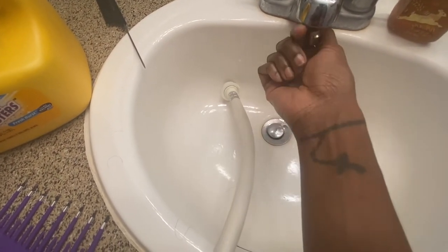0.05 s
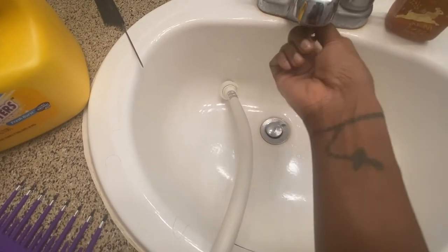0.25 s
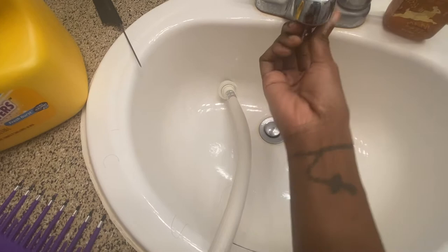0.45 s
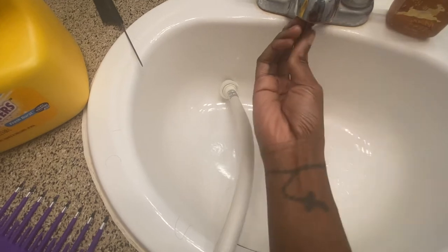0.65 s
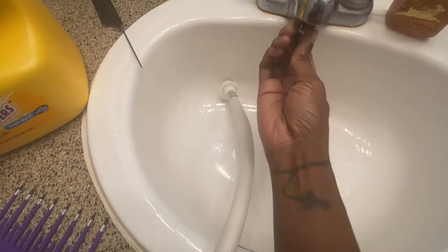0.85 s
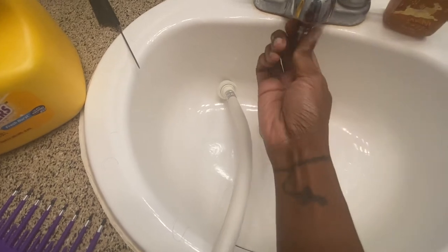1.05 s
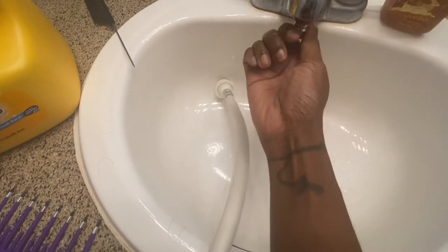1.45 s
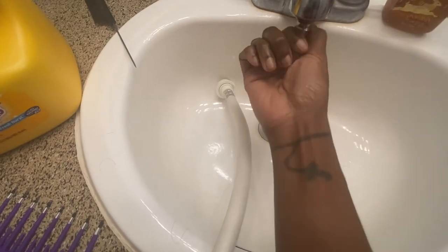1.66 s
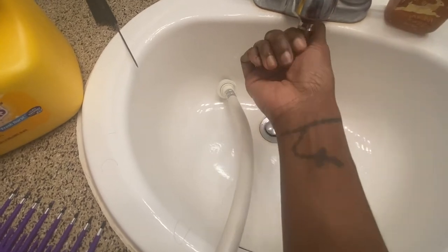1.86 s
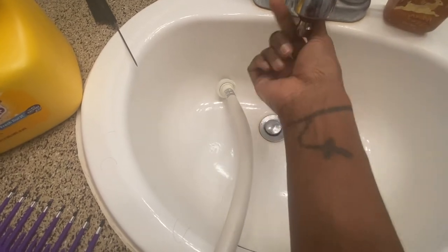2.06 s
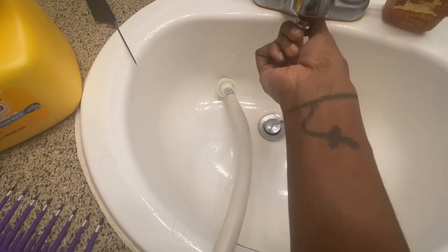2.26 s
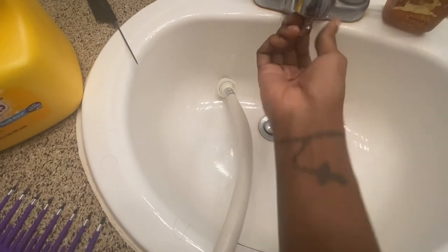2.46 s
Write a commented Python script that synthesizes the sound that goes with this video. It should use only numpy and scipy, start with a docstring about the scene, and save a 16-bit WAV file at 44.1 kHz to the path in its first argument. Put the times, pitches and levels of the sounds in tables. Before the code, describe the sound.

Metal tap fitting clicking and scraping irregularly as fingers twist it in a small bathroom.

```python
"""Twisting a tap fitting.

Fingers twist a metal fitting on a bathroom tap, close by. The loose thread clicks and scrapes,
driving the modes of tap and basin, and the spout rings briefly. Firm pushes thump the sink top.
A small hard room reflects the metal sounds, over a low steady hum."""
import sys
import numpy as np
from scipy import signal
from scipy.fft import rfft, irfft
from scipy.io import wavfile

SR = 44100
rng = np.random.default_rng(int(sys.argv[2]) if len(sys.argv) > 2 else 0)


def to_wav(s):
    """Save 16-bit WAV."""
    ch = np.atleast_2d(s).T  # columns
    pcm = np.round(np.clip(ch, -1, 1) * 32767)  # PCM
    wavfile.write(sys.argv[1], SR, pcm.astype(np.int16))


N = 110250
SHOT = 16384  # samples per event buffer


def undb(db):
    """Decibels to gain."""
    return 10 ** (np.asarray(db) / 20)


def curve(hz, points, values):
    """Linear interpolation over log frequency."""
    return np.interp(np.log(hz + 1e-9), np.log(points), values)


def fade(t, t60):
    """Exponential decay, 60 dB down at t60."""
    return np.exp(-np.log(1000) * t / t60)


def wander(rate_hz):
    """Random values joined by straight lines."""
    steps = np.arange(0, SHOT, SR / rate_hz)
    return np.interp(np.arange(SHOT), steps, rng.standard_normal(len(steps)))


def pan(db):
    """Stereo gains for a left-minus-right level."""
    return undb(np.array([[db], [-db]]) / 2)


def add(out, start_s, sound):
    """Mix a sound in at its start time."""
    i = max(int(start_s * SR), 0)
    n = max(min(sound.shape[-1], N - i), 0)
    out[:, i:i + n] += sound[:, :n]


# room noise spectrum (frequency [Hz], relative density [dB])
RUMBLE_SPECTRUM = [(20, 7.5), (27, -12), (40, -18), (70, 3), (160, -9), (250, -32.5), (500, -40),
                   (1000, -41.5), (3000, -53.5), (11000, -60.5), (15000, -76)]

def rumble(level_db=-47.5, wide_hz=500):
    """Quiet room noise, nearly mono in the bass."""
    hz = np.arange(N // 2 + 1) * SR / N
    mid, side = rfft(rng.standard_normal((2, N))) * undb(curve(hz, *np.array(RUMBLE_SPECTRUM).T))
    width = np.clip(hz / wide_hz, .15, 1)
    air = irfft(mid + side * width * np.array([[1], [-1]]), N)
    return air / air.std() * undb(level_db)


def hum(hz=119.1, level_db=-50.5, waver_db=3):
    """Electrical hum, wavering in level."""
    t = np.arange(N) / SR
    waver = np.interp(t, np.linspace(0, t[-1], 30), rng.standard_normal(30))
    return np.sqrt(2) * undb(level_db + waver_db * waver) * np.sin(2 * np.pi * hz * t) * pan(-4)


# room tail (frequency [Hz], t60 [s], level re direct sound [dB])
ROOM_TAIL = [(150, 0.32, 2), (392, 0.31, 2), (1057, 0.28, -5), (2360, 0.22, -9.5), (5000, 0.22, -4),
             (10900, 0.17, -9)]

def room(dry, build_s=.0065):
    """Dense reflections off hard walls; the treble dies first."""
    t = np.arange(2 * SHOT) / SR
    hz = np.arange(SHOT + 1) * SR / (2 * SHOT)
    noise = rfft(rng.standard_normal((2, 2 * SHOT)))
    tail = 0
    for weights, (_, t60, db) in zip(np.eye(len(ROOM_TAIL)), ROOM_TAIL):
        band = irfft(noise * curve(hz, np.array(ROOM_TAIL)[:, 0], weights))
        envelope = (1 - np.exp(-t / build_s)) * fade(t, t60)
        tail = tail + band * envelope * undb(db) / np.sqrt(np.sum(envelope ** 2))
    return signal.fftconvolve(dry, tail, axes=1)[:, :N]


# low room modes (frequency [Hz], level re thump [dB], t60 [s])
BOOM_MODES = [(75.5, -13.5, 1), (163.3, -25, 0.93), (189.9, -30.5, 0.69)]
# thud noise band (low edge [Hz], high edge [Hz])
THUD_BAND_HZ = [150, 260]
# pushes on the sink top (start [s], relative level [dB], pitch [Hz])
PUSHES = [(0.206, -16.5, 88), (.251, -22.5, 111), (.323, -25.5, 78), (.354, -29, 81), (0.533, -35, 95),
          (.673, -25.5, 91.5), (0.741, -31.5, 76.6), (0.879, -30.5, 105.6), (1.112, -27, 94),
          (1.212, -38, 69.6), (1.388, -37, 88), (1.566, -34, 95), (2.171, -27.5, 80), (2.319, -31, 90)]

def thumps(rise_s=.0301, gain_db=1.5, thud_db=-21):
    """The pushed sink top swings a few cycles, leaving a low boom and a dull thud."""
    out, t = np.zeros((2, N)), np.arange(2 * SHOT) / SR
    age = t / rise_s
    swell = (age * np.exp(1 - age)) ** 12.6
    build = 1 - np.exp(-age ** 2)
    boom = build * sum(undb(db) * fade(t, t60) * np.sin(2 * np.pi * hz * t) for hz, db, t60 in BOOM_MODES)
    thud_filter = signal.butter(2, THUD_BAND_HZ, "band", fs=SR, output="sos")
    for start, db, hz in PUSHES:
        noise = signal.sosfilt(thud_filter, rng.standard_normal((3, len(t))))
        stereo = (noise[0] + .5 * noise[1:]) / noise.std()
        thud = stereo * undb(thud_db) * build * fade(t, t60=.34)
        swing = -swell * np.cos(2 * np.pi * hz * (t - rise_s))
        add(out, start, undb(db + gain_db) * pan(-3) * (boom + thud + swing))
    return out


# tap and basin modes (frequency [Hz], relative peak [dB], t60 [s])
TAP_MODES = [(806, -7, 0.52), (907, 8.5, 0.09), (1030.6, 11, 0.032), (1113, 4, 0.15), (1313, 7, 0.22),
             (1415, 7, 0.21), (2269, 17, 0.029), (2336, 14.5, 0.043), (2700, 6.5, 0.11), (3050, 5, 0.07),
             (3504, 11, 0.038), (4014, 5, 0.098), (5430, 6.5, 0.064), (5786, 4.5, 0.054)]
# contact colour (frequency [Hz], relative level [dB])
CONTACT_SPECTRUM = [(90, 2), (180, 7.5), (300, 0.5), (440, -2.5), (600, -5), (780, -2.5), (1100, -2),
                    (1650, 3), (2300, -10), (2750, -11.5), (4400, -18.5), (5800, -21.5), (6800, -27.5),
                    (8400, -24.5), (9700, -10.5), (11300, -16), (12500, -39.5), (15000, -36)]

def tap_response(grip_detune=.014, grip_db=4):
    """Tap and basin under one contact: broad colour, narrow modes shifted and weighted by the grip."""
    hz = np.arange(SHOT // 2 + 1) * SR / SHOT
    grip = rng.uniform(-1.01, 1, (len(TAP_MODES), 2))
    modes = 1 + 0j
    for (mode_hz, db, t60), (shift, weight) in zip(TAP_MODES, grip):
        offset_hz = hz - mode_hz * (1 + grip_detune * shift)
        modes = modes + undb(db + grip_db * weight) / (1 + 2j * np.pi * offset_hz * t60 / np.log(1000))
    cepstrum = irfft(np.log(undb(curve(hz, *np.array(CONTACT_SPECTRUM).T))))
    cepstrum[1:SHOT // 2] *= 2  # fold to minimum phase
    cepstrum[SHOT // 2 + 1:] = 0
    return modes * np.exp(rfft(cepstrum))


# band edges (low/mid [Hz], mid/high [Hz], high/top [Hz])
CROSSOVERS_HZ = [1600, 3000, 7000]

def drive_tap(envelope, band_db, length_s, shared_power=.27):
    """A noisy force drives the tap; each band gets the energy of its level held for length_s."""
    hz = np.arange(SHOT // 2 + 1) * SR / SHOT
    common, *sides = rfft(rng.standard_normal((3, SHOT)) * envelope)
    force = np.sqrt(shared_power) * common + np.sqrt(1 - shared_power) * np.array(sides)
    spectrum = force * tap_response()
    lowpass = [0] + [1 / (1 + (hz / edge) ** 16) for edge in CROSSOVERS_HZ] + [1]
    out = 0
    for k, db in enumerate(band_db):
        band = irfft(spectrum * (lowpass[k + 1] - lowpass[k]))[:, :SHOT // 2]
        energy = np.sum(band ** 2, axis=1, keepdims=True)
        out = out + band * undb(db) * np.sqrt(length_s * SR / energy)
    return out


# thread scrapes, relative levels (start [s], length [s], low [dB], mid [dB], high [dB], top [dB])
THREAD_SCRAPES = [(0.209, 0.073, -39, -44, -51, -81), (0.266, 0.017, -36, -67, -60, -79),
                  (0.382, 0.064, -45, -55.5, -62.5, -69.5), (0.556, 0.046, -48.5, -60, -63.5, -67),
                  (.69, 0.064, -36.5, -45, -58, -68), (0.881, 0.0572, -35.5, -43.5, -53, -61.5),
                  (1.068, 0.029, -44.5, -67, -72, -92), (1.095, 0.0378, -34, -39.5, -38, -57.5),
                  (1.195, 0.049, -43.5, -51, -60.5, -72), (1.433, 0.151, -51.5, -55, -61.5, -66.5),
                  (1.567, 0.045, -51.5, -43.5, -53.5, -61), (1.623, 0.14, -49, -53.5, -60.5, -67),
                  (1.926, 0.025, -42.5, -56.5, -70, -71.5), (2.286, 0.063, -47, -67, -63, -72)]

def scrapes(gain_db=-5, slips_per_s=3700, spread_db=5, grain_s=.0022, edge_s=.0075, catch_db=2.5):
    """The thread sticks and slips in dense grains, louder where it catches."""
    out, t = np.zeros((2, N)), np.arange(SHOT) / SR
    for start, length, *band_db in THREAD_SCRAPES:
        slips = (rng.random(SHOT) < slips_per_s / SR) * undb(spread_db * rng.standard_normal(SHOT))
        grains = signal.lfilter([1], [1, -np.exp(-1 / (grain_s * SR))], slips) + 1e-6
        gate = np.clip(np.minimum(t, length - t) / edge_s, 0, 1)
        catches = undb(catch_db * wander(rate_hz=420))
        add(out, start, drive_tap(grains * gate * catches, band_db, length) * undb(gain_db))
    return out


def ring(hz, t60, rise_s=.001, right_lag_rad=1.32):
    """One decaying mode, out of step between left and right."""
    t = np.arange(SHOT) / SR
    phase = 2 * np.pi * hz * t - np.array([[0], [right_lag_rad]])
    return np.sin(phase) * (1 - np.exp(-t / rise_s)) * fade(t, t60)


# spout chimes (start [s], pitch [Hz], level [dB])
SPOUT_CHIMES = [(.263, 1848, -32), (.338, 1840, -32.5), (.552, 1600, -44), (0.681, 1376, -32.5),
                (.68, 750, -34), (.686, 867, -30), (.686, 1766, -40.5), (0.681, 472, -36),
                (1.125, 1322, -30), (1.122, 813, -36), (1.12, 3526, -41.5), (1.577, 2500, -40),
                (2.183, 850, -42), (2.332, 790, -42)]

def chimes(t60=.14, beat_hz=21, partner_db=-13, waver_db=3):
    """The spout rings on after firmer clicks; close mode pairs beat and the level flickers."""
    out = np.zeros((2, N))
    for start, hz, db in SPOUT_CHIMES:
        pair = ring(hz, t60) + undb(partner_db) * ring(hz + beat_hz, t60)
        add(out, start, undb(db + waver_db * wander(rate_hz=110)) * pair)
    return out


# fitting clicks, relative levels (time [s], swell [s], low [dB], mid [dB], high [dB], top [dB],
# ring pitch [Hz], ring level [dB], left minus right [dB])
FITTING_CLICKS = [(0.154, 0.009, -44.5, -51, -67, -67.5, 1092, -29.5, -0.5),
                  (0.2058, 0.0029, -31, -31.5, -37.5, -37.5, 790, -28, 2),
                  (.251, .003, -35.5, -43.5, -55, -63, 1000, -28, 9.5),
                  (.262, 0.0026, -32, -41.5, -42, -53, 1029, -12.5, 1.5),
                  (0.337, 0.0049, -30, -36.5, -42, -51.5, 936, -20.5, 4.5),
                  (.475, 0.0011, -55, -52, -67, -71, 760, -37.5, 1.5),
                  (0.548, 0.0045, -38.5, -47.5, -49.5, -59, 1464, -35, 4),
                  (.676, 0.0033, -29, -33.5, -40.5, -46, 1021, -11, 1),
                  (.682, 0.0036, -28.5, -32, -35.5, -44.5, 922, -20, 1.5),
                  (.686, 0.0013, -29, -37, -37.5, -44, 824, -27, 3),
                  (0.815, 0.0053, -40.5, -61, -65, -78, 2230, -40.5, -1),
                  (.859, 0.0036, -40, -55, -59, -66, 936, -30, 0.5),
                  (0.888, 0.0074, -36, -48, -50.5, -67, 907, -23.5, 1.5),
                  (1.092, 0.0081, -38.5, -45, -57, -61, 1056, -19.5, 2),
                  (1.109, 0.0098, -30, -34.5, -40.5, -50, 845, -17, 3),
                  (1.122, 0.004, -33.5, -35, -39.5, -48, 1028, -17.5, -0.5),
                  (1.24, 0.005, -46.5, -54, -61, -73, 2260, -48, 3),
                  (1.275, 0.011, -41, -45, -53, -62, 1304, -40, 1.5),
                  (1.395, 0.0085, -42, -50, -58.5, -63.5, 1100, -46, 2),
                  (1.476, 0.0045, -38.5, -43, -55.5, -63, 893, -26.5, 4),
                  (1.578, 0.0067, -33.5, -33, -43, -61.5, 1057, -22, 0.5),
                  (1.787, 0.005, -39.5, -46.5, -58, -66, 1090, -32.5, 1),
                  (1.845, 0.0083, -39, -37, -52.5, -67, 1120, -31, 2.5),
                  (.924, 0.005, -38.5, -41.5, -55, -67, 1420, -27, 3.5),
                  (1.927, 0.0076, -43, -41, -58.5, -69.5, 1122, -31, 1.5),
                  (2.174, 0.0031, -41, -48, -51.5, -62, 741, -32.5, 0),
                  (2.183, 0.0042, -37.5, -32.5, -45.5, -59.5, 790, -25.5, 2.5),
                  (2.281, 0.0024, -66, -50.5, -73, -92, 980, -39, 2),
                  (2.32, 0.0045, -58, -54, -59.5, -62, 760, -41, 10),
                  (2.331, 0.0024, -46.5, -45.5, -47, -51, 2454, -30.5, 1),
                  (2.417, 0.0022, -51.5, -59.5, -70.5, -93, 882, -42.5, 4.5)]

def clicks(chatter_gain_db=-2.5, ring_gain_db=-3, lead_in_db=-12.5, lead_s=.03, chatter_s=.0082):
    """Each click swells in faintly, catches and chatters a few ms, then rings, pitched by the grip."""
    out, t = np.zeros((2, N)), np.arange(SHOT) / SR - lead_s
    for time, swell_s, *band_db, hz, ring_db, pan_db in FITTING_CLICKS:
        approach = np.minimum(t, 0) / swell_s
        lead_in = undb(lead_in_db) * np.exp(approach / 1.16)
        catch = np.clip(1 + approach, 0, 1) ** 2
        decay_s = min(chatter_s, .0012 + swell_s)  # a sudden catch lets go quickly
        envelope = np.maximum(catch, lead_in) * np.exp(-np.maximum(t, 0) / decay_s)
        chatter = drive_tap(envelope, band_db, chatter_s)
        add(out, time - lead_s, undb(chatter_gain_db) * chatter * pan(pan_db))
        add(out, time, undb(ring_db + ring_gain_db) * ring(hz, t60=.036) * pan(pan_db))
    return out


def scene():
    """Metal sounds and their reflections over thumps, rumble and hum."""
    metal = clicks() + chimes() + scrapes()
    return metal + room(metal) + thumps() + rumble() + hum()


def record(dry, low_cut_hz=18, high_cut_hz=15400):
    """Cut the deepest rumble and the extreme treble."""
    dry = signal.sosfilt(signal.butter(2, low_cut_hz, "high", fs=SR, output="sos"), dry)
    return signal.sosfilt(signal.ellip(8, .2, 70, high_cut_hz, fs=SR, output="sos"), dry)


dry = scene()
out = record(dry)
to_wav(out)
```